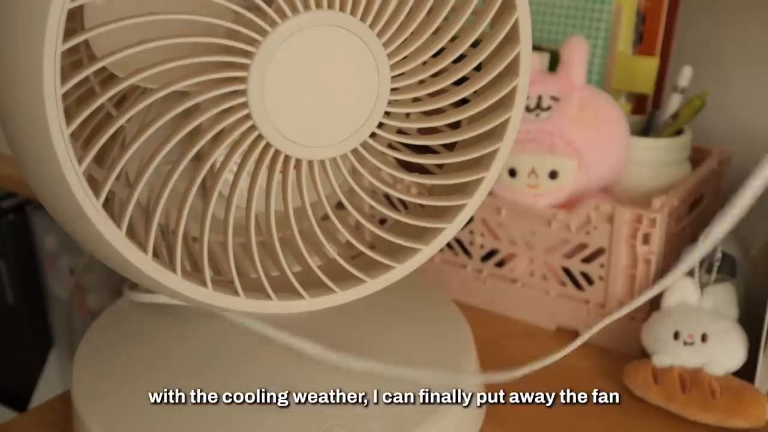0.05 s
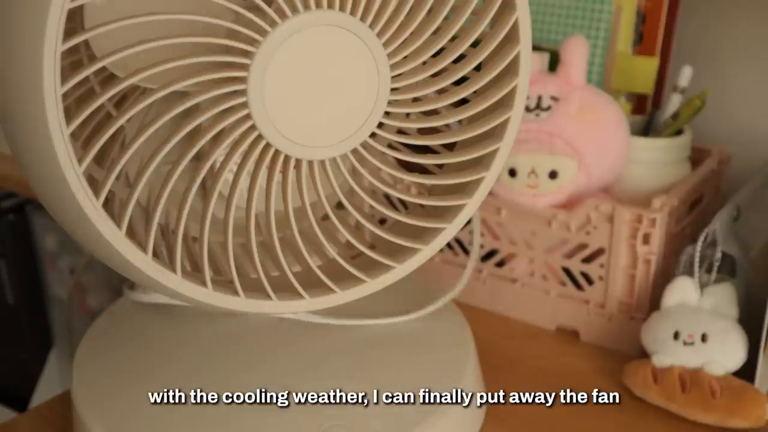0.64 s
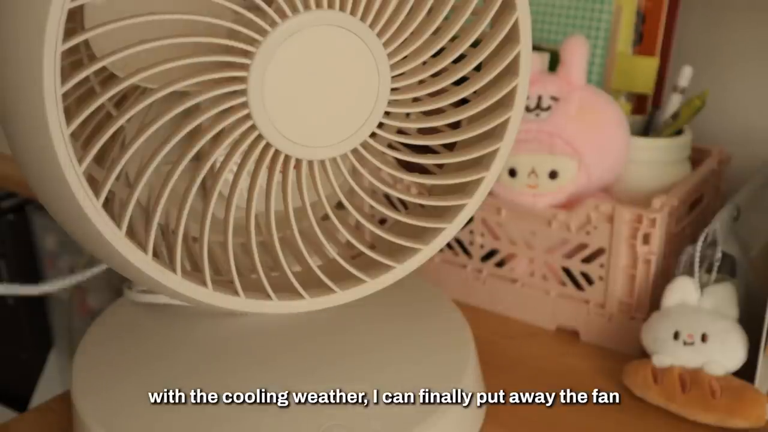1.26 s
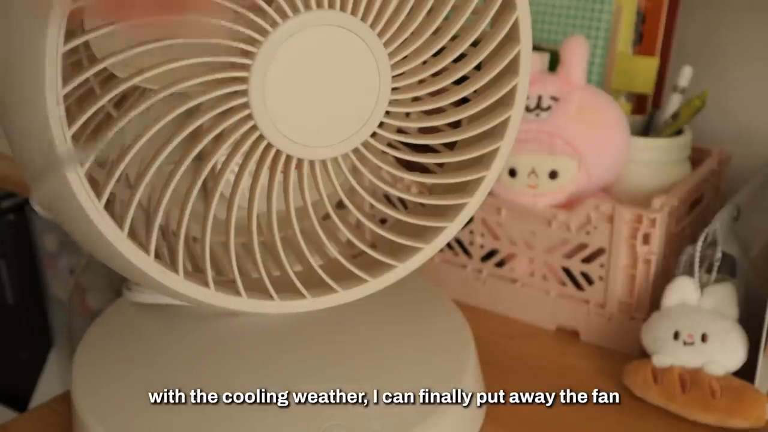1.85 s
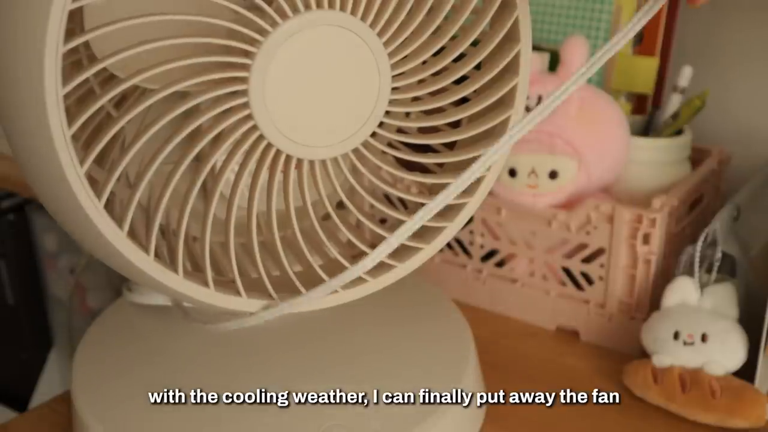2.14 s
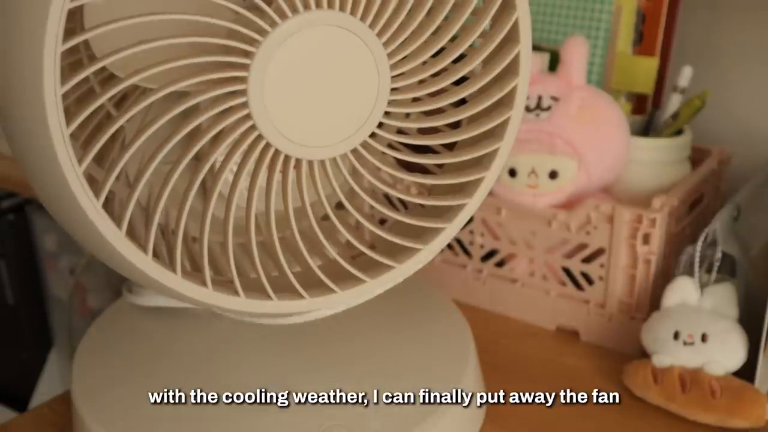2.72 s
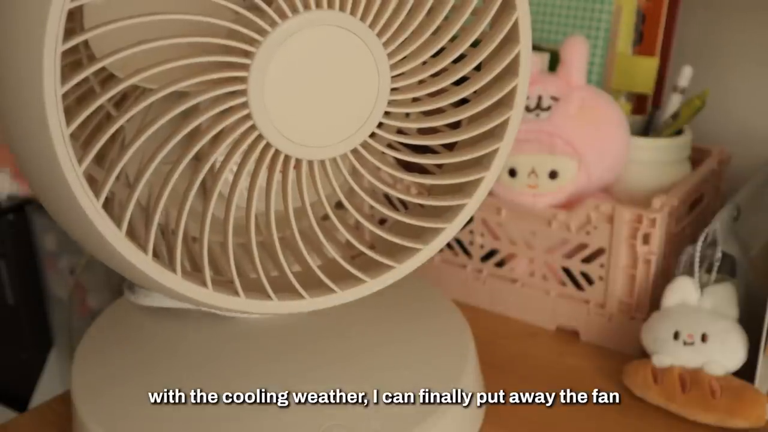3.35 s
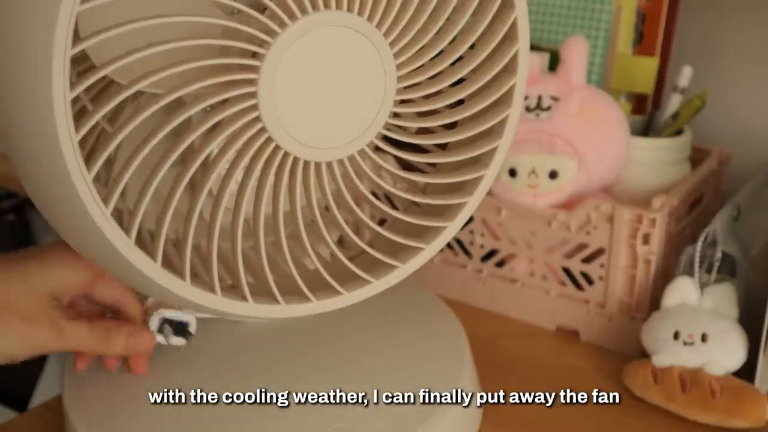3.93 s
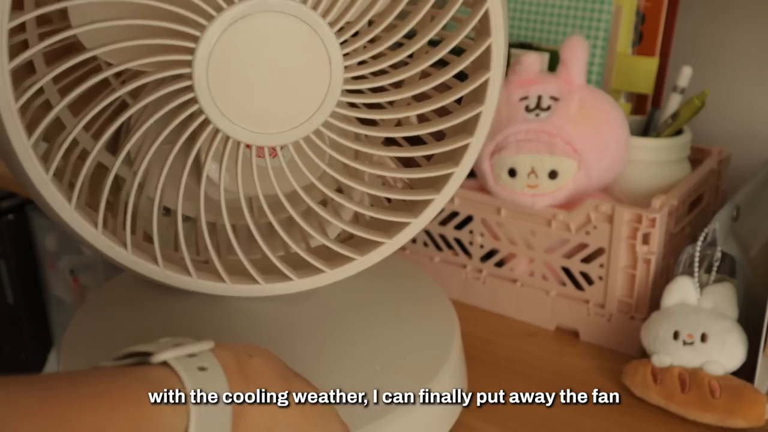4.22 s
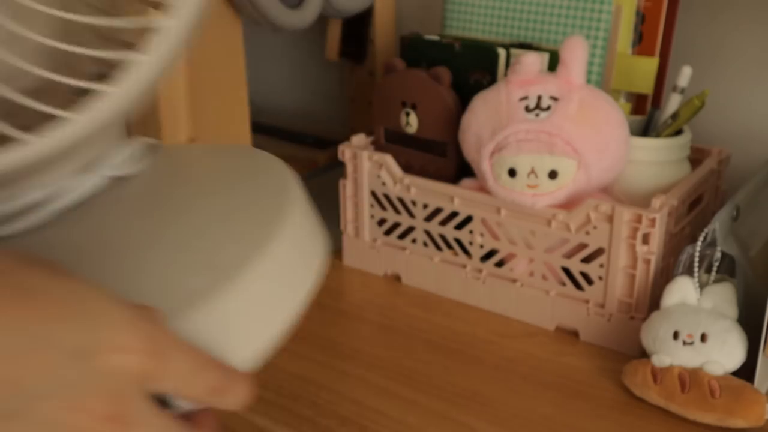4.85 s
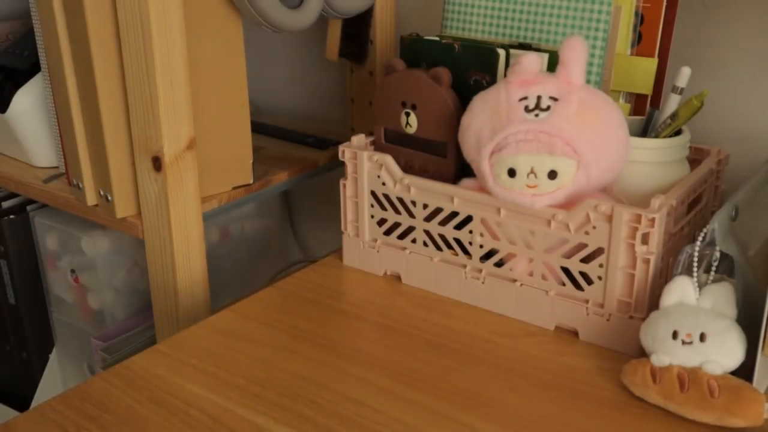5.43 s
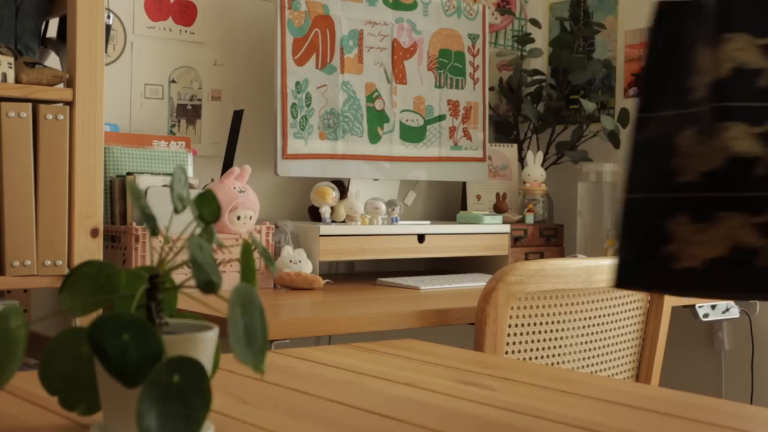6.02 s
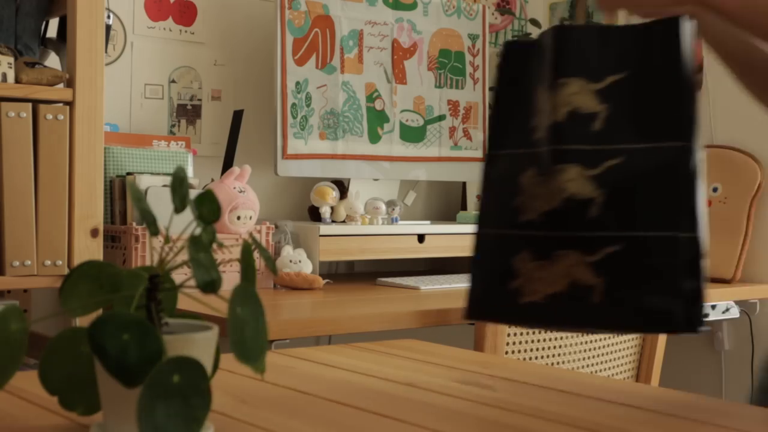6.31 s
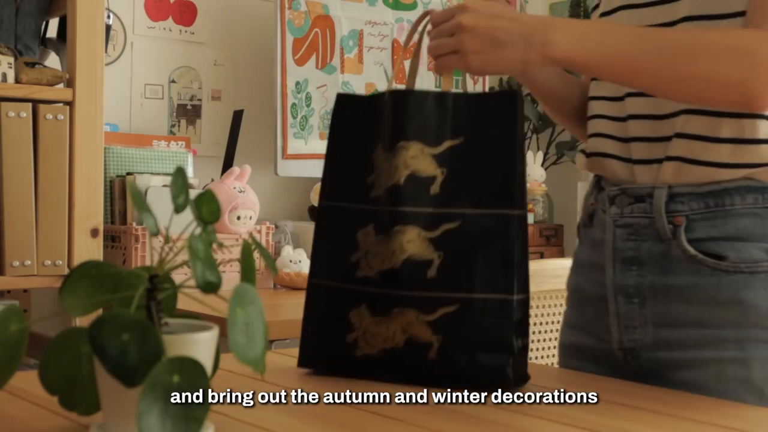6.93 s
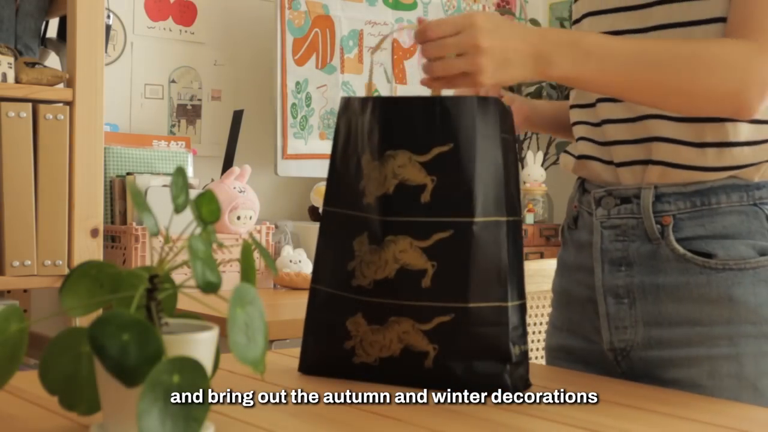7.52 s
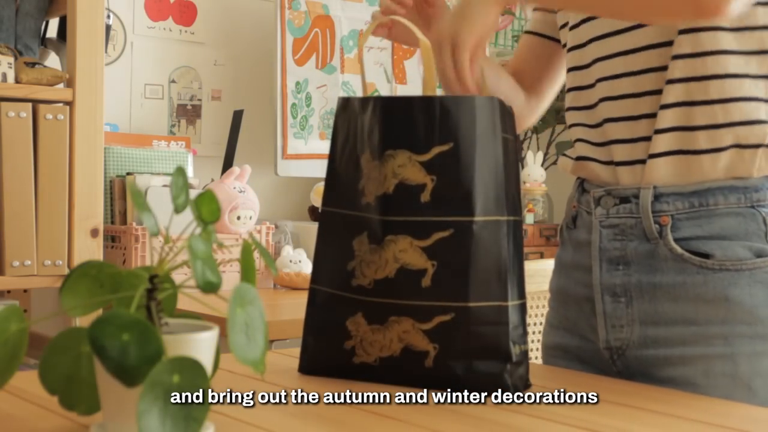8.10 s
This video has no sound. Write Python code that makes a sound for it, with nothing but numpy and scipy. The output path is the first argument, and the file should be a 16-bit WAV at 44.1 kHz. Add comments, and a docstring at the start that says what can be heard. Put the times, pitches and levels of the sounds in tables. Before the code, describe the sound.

Faint cord rubbing and taps, a plastic fan scraping across a wooden desk, then a paper shopping bag popping and crinkling in a quiet room.

```python
"""A small quiet room with a low hum. A power cord is wound round a plastic desk fan: it rubs, zips and
taps on the housing. From 4 s everything is louder: the fan is gripped, knocks and is dragged away,
its plug clacking and the desk booming under it. Then a stiff paper shopping bag is carried in, pops
as it swings and crumples down on a wooden table, and its handles are let go with a swish.
Rubs and crackles are streams of tiny slips; knocks are clicks with a burst of chatter into a body."""
import sys
import numpy as np
from scipy import signal
from scipy.fft import rfft, irfft
from scipy.io import wavfile
from scipy.ndimage import uniform_filter1d

SR = 44100
rng = np.random.default_rng(int(sys.argv[2]) if len(sys.argv) > 2 else 0)


def store_wav(level_fs):
    """Save 16-bit WAV to argv[1]."""
    pcm = np.round(np.clip(np.atleast_2d(level_fs), -1, 1) * 32767)
    wavfile.write(sys.argv[1], SR, pcm.T.astype(np.int16))


N = 360297


def from_db(db):
    """Decibels to gain."""
    return 10 ** (np.asarray(db) / 20)


def rms_one(x):
    """Scale to rms 1."""
    return x / np.sqrt(np.mean(x ** 2) + 1e-20)


def decay(t, t60):
    """An envelope that falls 60 dB in t60 seconds."""
    return np.exp(-np.log(1000) * t / t60)


def band(x, low, high):
    """Band-pass between two edges in Hz."""
    return signal.sosfilt(signal.butter(3, [low, high], "band", fs=SR, output="sos"), x)


def through(x, response):
    """Pass x through an impulse response."""
    return signal.fftconvolve(x, response)[:len(x)]


def drift(per_s):
    """A random modulator that glides to a new value per_s times a second."""
    knots = rng.standard_normal(4096)
    return np.interp(np.arange(N) / SR * per_s, np.arange(len(knots)), knots)


def damped_body(colour, size=4096):
    """Minimum-phase impulse response of a well damped body with this EQ curve."""
    hz, db = np.transpose(colour)
    grid = np.maximum(np.fft.rfftfreq(size, 1 / SR), 1)
    octaves_outside = np.abs(np.log2(grid / np.clip(grid, hz.min(), hz.max())))
    gain = from_db(np.interp(np.log(grid), np.log(hz), db) - 10 * octaves_outside)
    cepstrum = irfft(np.log(gain))
    cepstrum[1:size // 2] *= 2
    cepstrum[size // 2 + 1:] = 0
    return irfft(np.exp(rfft(cepstrum)))


def ringing_body(modes):
    """Impulse response of a set of modes, each with the given gain at its peak."""
    t = np.arange(SR // 4) / SR
    out = np.zeros(len(t))
    for hz, db, t60 in modes:
        damping = np.log(1000) / t60
        out += from_db(db) * 2 * damping / SR * np.cos(2 * np.pi * hz * t) * decay(t, t60)
    return out


def slips(per_s, spread_db, smooth_db):
    """Friction: tiny slips of very uneven size over a smooth hiss."""
    sizes = from_db(spread_db * np.minimum(rng.exponential(1, N), 4)) * rng.choice([-1, 1], N)
    grains = rms_one(sizes * (rng.random(N) < per_s / SR))
    return rms_one(grains + from_db(smooth_db) * rng.standard_normal(N))


def swell(peak_s, rise_s, fall_s, depth_db=22.5, roundness=1.56):
    """Envelope of a move: 1 at its fastest, depth_db down at the ends of its rise and fall."""
    t = np.arange(N) / SR - peak_s
    away = np.clip(np.maximum(-t / rise_s, t / fall_s), 0, 4)
    return from_db(-depth_db * away ** roundness)


def gains(moves):
    """One fader curve for each level column; overlapping moves add in power."""
    return np.sqrt(sum(np.outer(from_db(row[3:]), swell(*row[:3])) ** 2 for row in moves))


# The thump, knock, snap and crack bands of a hit. Each row: low edge in Hz, high edge in Hz.
HIT_BANDS = [(130, 450), (450, 1500), (1500, 4500), (4500, 15500)]

def contacts(hits, body, click, crack_loss_db, treble_life=1.0):
    """A click and a dying chatter drive the body; weight adds thump, hardness adds snap and crack."""
    out, t = np.zeros(N + SR), np.arange(SR // 5) / SR
    lives = np.geomspace(1, treble_life, len(HIT_BANDS))
    for start_s, level_db, weight_db, hardness_db, t60 in hits:
        bands_db = level_db + np.array([weight_db, 0, hardness_db, 2 * hardness_db - crack_loss_db])
        start, chatter = int(start_s * SR), rng.standard_normal(len(t))
        for (low, high), db, life in zip(HIT_BANDS, bands_db, lives):
            force = chatter * decay(t, t60 * life)
            force[0] += click
            sound = band(through(force, body), low, high)
            attack_rms = np.sqrt(np.mean(sound[:SR // 100] ** 2))
            out[start:start + len(t)] += from_db(db) * sound / attack_rms
    return out[:N]


def moving_resonance(x, centre_hz, width_hz, size=256):
    """A resonance whose centre glides, block by block."""
    out, state = np.zeros(N), np.zeros(2)
    radius = np.exp(-np.pi * width_hz / SR)
    for i in range(0, N, size):
        poles = [1, -2 * radius * np.cos(2 * np.pi * centre_hz[i] / SR), radius ** 2]
        out[i:i + size], state = signal.lfilter([1, 0, -1], poles, x[i:i + size], zi=state)
    return rms_one(out)


def singing_rub(strokes, width_hz, upper_db):
    """Stick-slip sings at the strongest stroke's gliding pitch and, more softly, about a fifth up."""
    t = np.arange(N) / SR
    levels = np.array([from_db(db) * swell(s, rise, fall) for s, rise, fall, db, _, _ in strokes])
    pitches = np.array([hz + glide * np.clip(t - s, -rise, fall)
                        for s, rise, fall, _, hz, glide in strokes])
    centre_hz = pitches[levels.argmax(axis=0), np.arange(N)]
    friction = slips(per_s=2800, spread_db=4.5, smooth_db=7)
    lower, upper = [moving_resonance(moving_resonance(friction, hz, width_hz), hz, width_hz)
                    for hz in (centre_hz, 1.46 * centre_hz)]
    return levels.max(axis=0) * rms_one(lower + from_db(upper_db) * upper)


# The dark EQ of the room's air. Each row: frequency in Hz, relative level in dB.
AIR_COLOUR = [(20, -54.5), (45, 0), (170, 1), (280, -6), (420, -8), (650, -10), (1000, -13), (2000, -18),
              (4200, -22), (5300, -28.5), (8000, -34.5), (15500, -38)]
# The room's low drone. Each row: pitch in Hz, relative peak in dB, ring time in seconds.
DRONE_MODES = [(70.2, -0.5, 0.31), (120.1, 2.5, 0.44)]
# An appliance's hum: lower and upper pitch in Hz.
HUM_HZ = [106.2, 123.8]
# The background bed. Each row: start in seconds, then air, drone, lower hum and upper hum in dB.
BED_LEVELS = [(0, -75, -73, -105, -78), (4.067, -54.5, -50.5, -100, -63), (5.66, -54.5, -71, -52.5, -59.5)]

def room_tone(fade_s=0.014):
    """A bed of soft air, low drone and two wavering hum tones that beat; its mix steps twice."""
    starts, *columns = np.transpose(BED_LEVELS)
    stretch = np.searchsorted(starts[1:], np.arange(N) / SR)
    air_db, drone_db, *hums_db = [uniform_filter1d(c[stretch], int(fade_s * SR) + 1) for c in columns]
    air = rms_one(through(rng.standard_normal(N), damped_body(AIR_COLOUR)))
    drone = rms_one(band(through(rng.standard_normal(N), ringing_body(DRONE_MODES)), 34, 141))
    out = from_db(air_db) * air + from_db(drone_db) * drone
    for hz, hum_db in zip(HUM_HZ, hums_db):
        phase = 2 * np.pi * np.cumsum(hz + drift(12)) / SR
        out += from_db(hum_db) * rms_one(np.sin(phase) * from_db(0.66 * drift(14)))
    return out


# Pulls of the cord. Each row: peak time, rise and fall in seconds, dull rub and bright rasp in dB.
CORD_PULLS = [(0.09, 0.072, 0.075, -75.5, -75.5), (0.335, 0.11, 0.072, -66, -73),
              (0.64, 0.1, .1, -71.5, -82), (0.76, 0.17, 0.08, -66.5, -74), (0.92, 0.04, 0.37, -63, -89),
              (1.07, 0.12, 0.12, -60, -58.5), (1.19, 0.04, 0.052, -70.5, -69),
              (1.59, 0.13, 0.13, -70.5, -73), (2.04, 0.063, 0.096, -80, -49.5),
              (2.09, 0.016, 0.044, -61, -67), (2.31, 0.12, 0.08, -71.5, -68), (2.57, .1, .07, -73, -60),
              (2.7, 0.097, 0.21, -78, -65), (2.88, 0.2, 0.16, -76.5, -65.5),
              (3.07, 0.08, 0.078, -71, -65.5), (3.2, 0.082, 0.13, -57.5, -54),
              (3.38, 0.056, .05, -65, -64.5), (3.5, 0.062, 0.25, -65.5, -68),
              (3.93, 0.12, .2, -77.5, -79.5)]
# The fan's hollow base. Each row: pitch in Hz, relative peak in dB, ring time in seconds.
BASE_MODES = [(468, 5, .08), (574, -2, 0.061), (780, -2, 0.044)]
# EQ curves of the rub, the rasp and the taps. Each row: frequency in Hz, relative level in dB.
RUB_COLOUR = [(150, -19), (350, -3.5), (480, 0.5), (620, -0.5), (800, -2.5), (1200, -4.5), (2000, -29),
              (4000, -47)]
RASP_COLOUR = [(600, -29), (1100, 0), (1600, 2.5), (2400, 0.5), (4000, -2), (5500, -12), (9000, -19.5),
               (15000, -25.5)]
TAP_COLOUR = [(120, -15.5), (280, 2), (480, 4.5), (750, 20.5), (1100, 13), (1500, 7), (2600, 3), (3700, 2),
              (5500, -5), (8000, -10.5), (12000, -20), (16000, -23)]
# Light taps. Each row: start in seconds, level, weight and hardness in dB, decay in seconds.
CORD_TAPS = [(0.1947, -62, -6, 3, 0.044), (0.2761, -55, 3, 2.5, 0.062), (0.521, -62.5, -0.5, 2.5, 0.06),
             (1.0559, -55, 0.5, -11, 0.026), (1.0985, -59, -6, 1, 0.038), (1.1409, -59, -11, -1, 0.075),
             (1.6053, -61.5, -7, -0.5, 0.12), (1.8033, -60.5, -12, 7, 0.039), (2.0794, -52, -14, -1, 0.022),
             (2.446, -54, -7, 6.5, .036), (2.5711, -64.5, 5, -11, 0.025), (2.9839, -59.5, -14, 3, 0.071),
             (3.0057, -44, 0, 4.5, 0.065), (3.012, -37.5, -7, -3, 0.044), (3.1298, -54, -4, 0.5, 0.05),
             (3.1998, -46.5, -8, 2.5, 0.033), (3.2271, -46.5, -7, -1.5, 0.043),
             (3.4374, -59.5, -2, 0, 0.058), (3.7049, -68, 1, 1.5, 0.12), (3.7799, -65, -10, -3.5, 0.039)]
# The taut cord singing on the grille. Each row: peak time, rise and fall in seconds, level in dB,
# pitch in Hz, glide in Hz per second.
CORD_ZIPS = [(2.04, 0.047, 0.076, -48.5, 2080, -6500), (2.31, 0.046, .055, -62.5, 1680, -2500),
             (2.52, 0.041, 0.069, -60, 1780, 5000), (2.69, .04, 0.11, -58.5, 1660, 1500),
             (2.81, 0.17, .15, -57.5, 1810, 900)]

def cord():
    """The cord rubs dully on the base, rasps and zips along the grille and taps the housing."""
    rub_gain, rasp_gain = gains(CORD_PULLS)
    base = ringing_body(BASE_MODES)
    base[0] += 1  # the dry rub passes along with the ring
    rub_body = through(base, damped_body(RUB_COLOUR))
    rub = rms_one(through(slips(per_s=580, spread_db=3.5, smooth_db=2.5), rub_body))
    rasp = rms_one(through(slips(per_s=4800, spread_db=5, smooth_db=1.5), damped_body(RASP_COLOUR)))
    rasp *= from_db(3 * drift(110))  # the ribs of the grille make it flutter
    taps = contacts(CORD_TAPS, damped_body(TAP_COLOUR), click=6.2, crack_loss_db=13, treble_life=0.71)
    zips = singing_rub(CORD_ZIPS, width_hz=380, upper_db=-6)
    return taps + rub_gain * rub + rasp_gain * rasp + zips


# Shoves and drags. Each row: peak time, rise and fall in seconds, groan and scrape in dB.
FAN_SHOVES = [(4.095, 0.03, 0.21, -57, -47.5), (4.38, 0.28, 0.64, -58.5, -57),
              (4.63, 0.17, 0.034, -57, -51.5), (4.77, 0.15, 0.33, -54, -62),
              (5.06, 0.17, 0.051, -47.5, -52), (5.2, 0.12, 0.18, -65.5, -59),
              (5.405, 0.08, 0.095, -42.5, -55.5), (5.51, 0.061, 0.12, -41.5, -50),
              (5.59, 0.083, 0.15, -46.5, -52)]
# The fan's housing. Each row: pitch in Hz, relative peak in dB, ring time in seconds.
HOUSING_MODES = [(298.5, 5.5, 0.038), (480, -7, 0.051), (656, -13, 0.044), (800, -29, 0.1),
                 (1146, -12, 0.12), (1350, -36, 0.09), (2155, -8.5, 0.035), (3500, -12, 0.013)]
# The EQ of scraping plastic. Each row: frequency in Hz, relative level in dB.
SCRAPE_COLOUR = [(500, 10), (1000, 8), (2000, -2), (4000, -5.5), (5500, -16.5), (7500, -16.5),
                 (10000, -20.5), (15000, -48)]
# Knocks and creaks. Each row: start in seconds, level, weight and hardness in dB, decay in seconds.
FAN_KNOCKS = [(4.0734, -50.5, -2, 1, 0.043), (4.1332, -40.5, -5, 7, 0.017), (4.1492, -37.5, 6, -7, 0.021),
              (4.2894, -50, 3, -3, 0.037), (4.307, -49.5, -14, 0.5, .045), (4.3567, -52, 1, 4.5, 0.062),
              (4.4659, -43.5, -11, 2, 0.05), (4.5175, -48, 2, 1.5, .035), (4.5904, -31.5, 5.5, -8, 0.029),
              (4.647, -46.5, 5, -17, 0.037), (4.7105, -54, -8, -0.5, 0.016), (5.0011, -47, -17, 0, .043),
              (5.0135, -47, 13.5, 3, 0.04), (5.0245, -36, -7, -20, 0.073), (5.0382, -49.5, 1, 3, 0.032)]

def fan():
    """The base scrapes over the desk; its judder and the knocks ring the hollow plastic housing."""
    groan_gain, scrape_gain = gains(FAN_SHOVES)
    judder = band(slips(per_s=550, spread_db=2, smooth_db=-18), 110, 1120)
    # pressed on the desk, the housing rings lower and friction keeps it ringing longer
    pressed = ringing_body([(hz * 0.93, db, t60 * 2) for hz, db, t60 in HOUSING_MODES])
    groan = rms_one(through(judder, pressed))
    plastic = damped_body(SCRAPE_COLOUR)
    scrape = rms_one(through(slips(per_s=2000, spread_db=7, smooth_db=4.5), plastic))
    housing = ringing_body(HOUSING_MODES)
    housing[:len(plastic)] += from_db(-16.5) * plastic  # the dry tick of the contact itself
    knocks = contacts(FAN_KNOCKS, housing, click=7.3, crack_loss_db=16)
    return knocks + groan_gain * groan + scrape_gain * scrape


# The shimmer of plug and grille. Each row: pitch in Hz, level in dB, ring time in seconds.
PLUG_CLUSTERS = [(3470, -34.5, 0.075), (4330, -47, 0.17), (6450, -40.5, 0.11)]

def plug(hit_s=4.134):
    """The plug clacks on the grille and both ring briefly in bright clusters of close modes."""
    t = np.arange(N) / SR - hit_s
    out = np.zeros(N)
    for hz, db, t60 in PLUG_CLUSTERS:
        cluster = rms_one(band(rng.standard_normal(N), hz * 0.897, hz * 1.025))
        out += cluster * (t > 0) * from_db(db) * decay(np.clip(t, 0, 1), t60)
    return out


# Booms of the desk. Each row: peak time, rise and fall in seconds, level in dB.
DESK_BOOMS = [(4.18, .05, 0.22, -47.5), (4.52, 0.17, 0.25, -43.5), (4.83, 0.18, 0.081, -46)]

def desk(pitch_hz=127.4, wander_hz=5.2):
    """The lowest mode of the desk top booms unsteadily as the fan's weight shifts."""
    boom_gain, = gains(DESK_BOOMS)
    phase = 2 * np.pi * np.cumsum(pitch_hz + wander_hz * drift(40)) / SR
    return boom_gain * rms_one(np.sin(phase))


# A brush of cloth. Each row: peak time, rise and fall in seconds, level in dB.
CLOTH_BRUSHES = [(5.177, 0.015, 0.065, -64)]
# The airy EQ of brushing cloth or paper. Each row: frequency in Hz, relative level in dB.
SWISH_COLOUR = [(1500, -10), (4000, 3), (6000, 0), (10000, 0), (13000, -2), (15500, -5)]

def cloth_brush():
    """Cloth brushes past with a short, bright swish as the fan is carried off."""
    brush_gain, = gains(CLOTH_BRUSHES)
    friction = slips(per_s=2200, spread_db=6, smooth_db=-1)
    return brush_gain * rms_one(through(friction, damped_body(SWISH_COLOUR)))


# The bag flexing. Each row: peak time, rise and fall in seconds, crumple and swish in dB.
BAG_FLEXES = [(6.05, 0.15, 0.13, -54.5, -69), (6.5, 0.088, 0.093, -47.5, -64), (6.86, .045, 0.15, -64, -64),
              (7.068, 0.015, 0.069, -37, -53.5), (7.12, 0.072, 0.094, -41, -67),
              (7.245, 0.08, .12, -30, -61), (7.35, 0.098, 0.15, -34.5, -76), (7.57, 0.16, 0.15, -47, -64),
              (7.745, 0.067, 0.023, -46.5, -57), (7.78, 0.2, .11, -49, -62),
              (7.96, 0.087, 0.048, -48.5, -57.5)]
# Its panels and hollow. Each row: pitch in Hz, relative peak in dB, ring time in seconds.
BAG_MODES = [(302, -21, 0.22), (454, -6.5, 0.058), (524, -2, 0.18), (753, -6, 0.29), (865, -7, 0.2),
             (1000, -8, 0.22), (1184, -8, 0.29), (1700, -3, 0.2), (2130, -2, 0.12), (3340, -7, 0.22),
             (3700, 5, 0.15)]
# The EQ of stiff paper. Each row: frequency in Hz, relative level in dB.
PAPER_COLOUR = [(41, -69), (70, -8), (174, -4), (244, -2), (385, -0.5), (451, -4), (579, -5), (761, -3),
                (1070, -5.5), (2070, -11), (2660, -14.5), (3260, -11), (6160, -29), (9060, -35),
                (16000, -49.5)]
# Panels buckling and landing. Each row: start in seconds, level, weight and hardness in dB,
# decay in seconds.
BAG_POPS = [(6.4475, -28, -2.5, -15, 0.054), (6.4569, -42.5, 5, 6.5, .07), (6.5551, -48, 4, -24, 0.052),
            (7.0737, -27.5, -11, -10.5, 0.016), (7.1031, -30, -30, -9, 0.02), (7.1828, -38, -20, -2, .036),
            (7.2061, -43.5, 10.5, 11.5, 0.0078), (7.2208, -38.5, 3, 2, 0.011),
            (7.2293, -33, -10, 0.5, 0.08), (7.251, -22, -12, 1, 0.04), (7.3198, -26.5, -2.5, -2.5, 0.068),
            (7.3402, -26, -12, -4, 0.049), (7.3502, -27.5, -27, -3.5, 0.16),
            (7.4463, -51, 14.5, -12, 0.073), (7.5317, -36.5, -7, -1, .1), (7.5387, -47, 11.5, -6, 0.063),
            (7.6629, -44.5, 6.5, -13, .055), (7.6695, -46, -4, 0.5, 0.036),
            (7.7373, -39.5, -9, -0.5, 0.043), (8.0904, -65.5, 5, 7.5, 0.046)]
# Skids on the table. Each row: peak time, rise and fall in seconds, level in dB, pitch in Hz,
# glide in Hz per second.
BAG_SKIDS = [(7.116, .014, 0.064, -38.5, 1140, 1200), (7.19, .05, .08, -44, 1160, -300),
             (7.515, .016, 0.025, -47, 1240, 1100)]

def bag():
    """Stiff panels pop, creases crackle in clumps, the base skids, and handles brush the paper."""
    crumple_gain, swish_gain = gains(BAG_FLEXES)
    panels = ringing_body(BAG_MODES)
    panels[0] += 1  # each snap is heard dry as well as ringing the bag
    paper = through(panels, damped_body(PAPER_COLOUR))
    creases = slips(per_s=1800, spread_db=3.5, smooth_db=-3) * from_db(1.8 * drift(90))
    crumple = rms_one(through(creases, paper))
    swish = rms_one(through(slips(per_s=1000, spread_db=5, smooth_db=3), damped_body(SWISH_COLOUR)))
    pops = contacts(BAG_POPS, paper, click=5.3, crack_loss_db=14.5)
    skids = singing_rub(BAG_SKIDS, width_hz=460, upper_db=-24)
    return pops + crumple_gain * crumple + swish_gain * swish + skids


def in_room(x, wet_db, gap_s, t60=0.25, treble_t60=0.21):
    """Direct sound plus a short diffuse tail that loses its treble first."""
    t = np.arange(SR // 2) / SR
    noise = rng.standard_normal(len(t)) * np.clip(t / gap_s - 1, 0, 1)
    low = band(noise, 168, 3360) * decay(t, t60)
    high = band(noise, 4800, 12800) * decay(t, treble_t60)
    tail = low + from_db(-1.5) * high
    full_band_gain = np.sqrt(np.sum((noise * decay(t, t60)) ** 2))
    return x + from_db(wet_db) * through(x, tail / full_band_gain)


def scene():
    """The mono mix: the fan is close by; the bag is farther off, with more room around it."""
    winding = in_room(cord(), wet_db=-9.5, gap_s=0.0052)
    dragging = in_room(fan() + cloth_brush() + plug(), wet_db=-11, gap_s=0.0016)
    carrying = in_room(bag(), wet_db=-8.5, gap_s=0.0042)
    return (winding + dragging + desk() + carrying + room_tone())[None]


def record(dry, cutoff_hz=15900):
    """A steep low-pass takes off the very top."""
    return signal.sosfilt(signal.ellip(10, .1, 70, cutoff_hz, fs=SR, output="sos"), dry)


dry = scene()
out = record(dry)
store_wav(out)
```